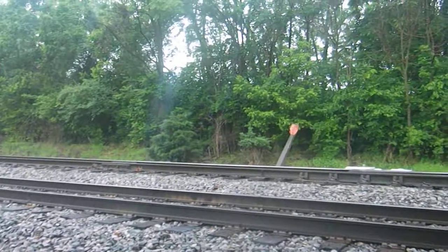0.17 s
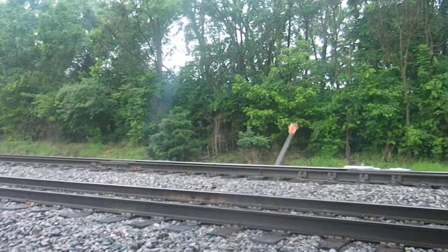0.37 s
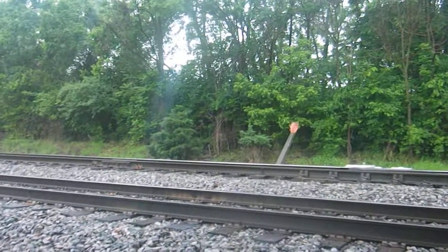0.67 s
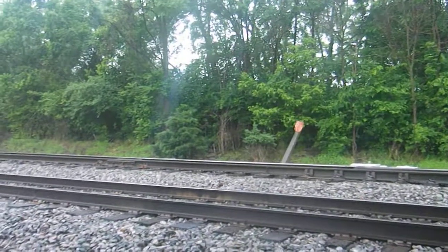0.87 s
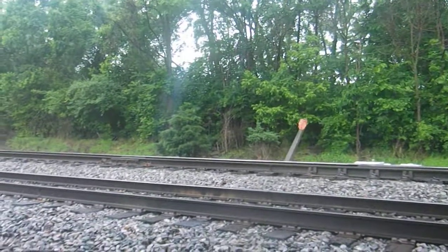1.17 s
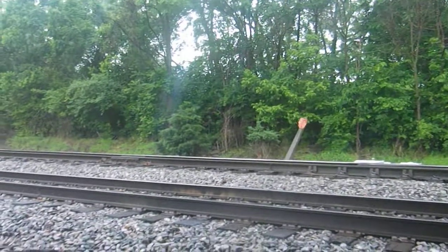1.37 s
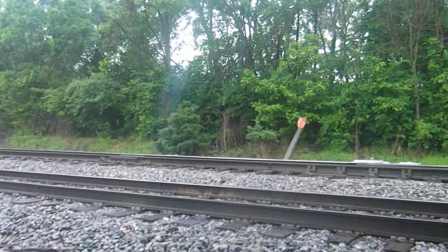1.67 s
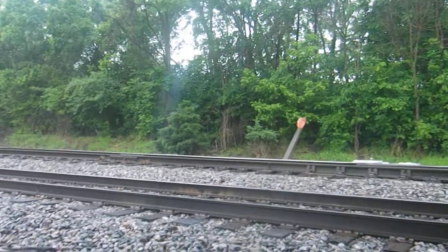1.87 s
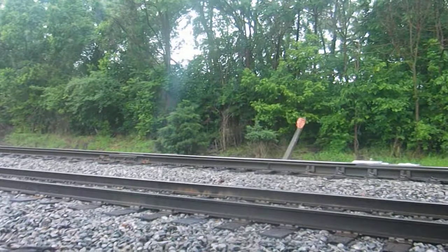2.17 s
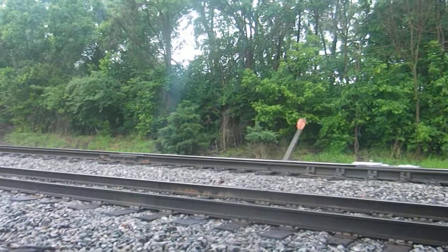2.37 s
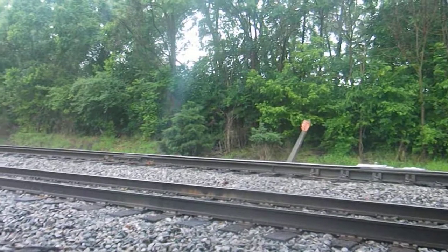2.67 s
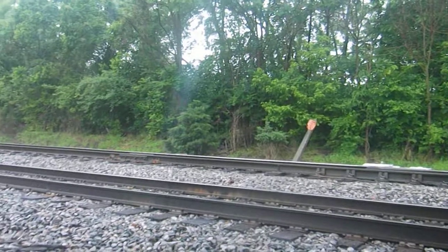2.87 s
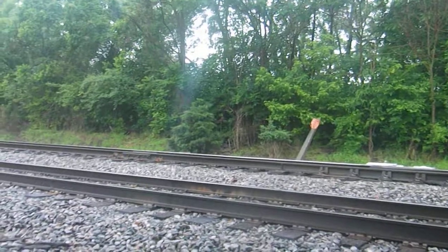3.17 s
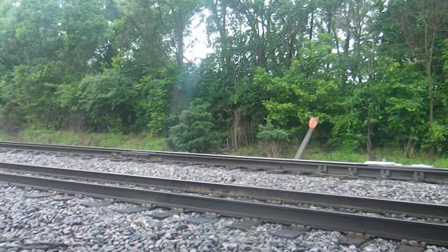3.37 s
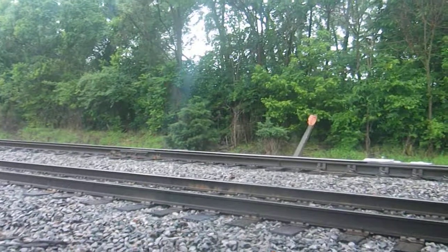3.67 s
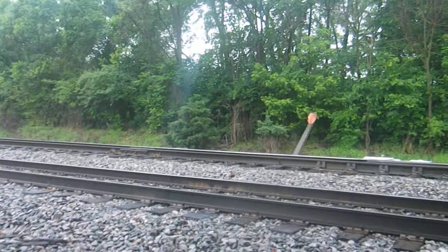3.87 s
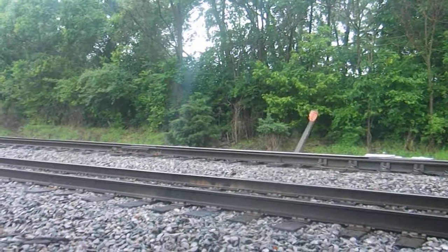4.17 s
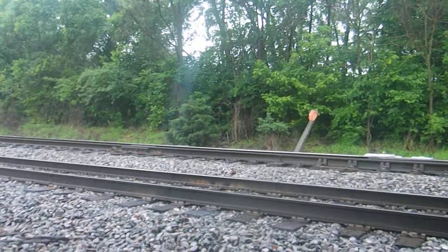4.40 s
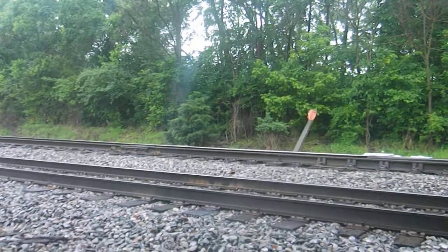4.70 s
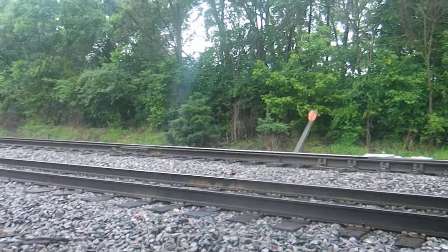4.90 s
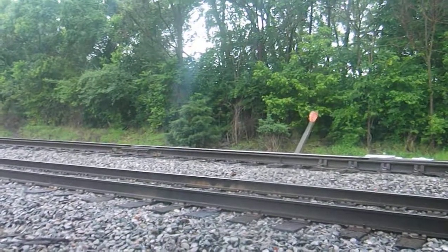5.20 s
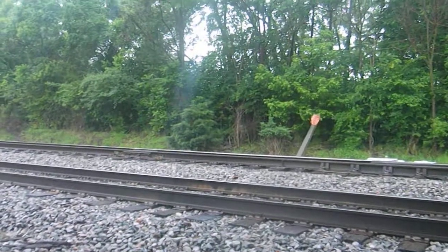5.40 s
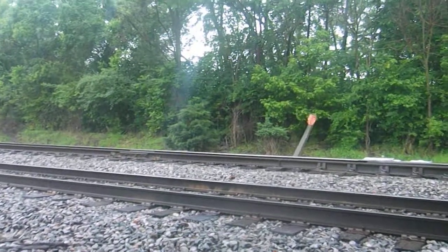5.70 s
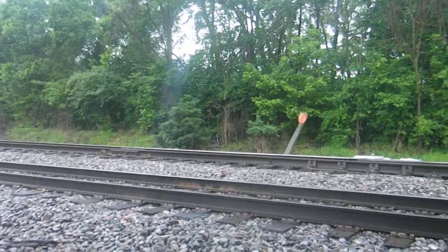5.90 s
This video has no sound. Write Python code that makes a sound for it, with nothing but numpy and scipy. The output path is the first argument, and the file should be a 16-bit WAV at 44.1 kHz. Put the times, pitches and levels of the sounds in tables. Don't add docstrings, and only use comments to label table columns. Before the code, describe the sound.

Clear falling bird whistles echo among trees above a distant traffic drone, joined by a burry wren, while a camera motor whines and fingers finally click its housing.

```python
import sys
import numpy as np
from scipy import signal
from scipy.fft import rfft, irfft, next_fast_len
from scipy.io import wavfile
from scipy.ndimage import uniform_filter1d

SR = 44100
rng = np.random.default_rng(int(sys.argv[2]) if len(sys.argv) > 2 else 0)


def elevation(decibels):
    levels = np.asarray(decibels, float)
    return 10 ** (levels / 20)


def unload_wav(signal):
    wavfile.write(
        sys.argv[1],
        SR,
        np.round(np.clip(np.atleast_2d(signal).T, -1, 1) * 32767).astype(np.int16),
    )


N = 266672
T = np.arange(N) / SR

# pitch_hz, level_db, drift_share (slow pitch drift as a share of the pitch)
ENGINE_TONES = [(40.7, -36, 0.0521), (60.07, -40.5, 0.0504), (78.36, -42, .05), (109.9, -43, .07)]
# time_s, level_db
ENGINE_LOAD = [(0, -2.5), (1.2, -1), (1.7, -0.9), (2.3, 0.5), (3.5, 1.5), (4.2, 0), (4.9, 1), (5.6, 0.3),
               (6.05, -1)]
# pitch_hz, level_db (per Hz)
WASH_COLOUR = [(12, -5.5), (22, 0.5), (45, -2), (100, -7), (200, -14.5), (330, -26.5), (600, -28),
               (1100, -30), (1600, -34), (2800, -37), (4500, -42), (7000, -46), (11000, -48),
               (16000, -48.5)]
# start_s, level_db
MOTOR_CURRENT = [(0, -43), (5.54, -44), (5.599, -47), (5.657, -50.5), (5.708, -69), (5.83, -52),
                 (5.848, -47), (5.868, -45), (5.902, -66), (5.918, -52), (5.94, -44), (5.953, -43.5),
                 (6.0, -48), (6.022, -52), (6.038, -70)]
# multiple (of a quarter of the chopper pitch), level_db
MOTOR_CLOCK = [(1, -69), (2, -68), (3, -68), (5, -70), (6, -73)]
# start_s, length_s, lowest_pitch_hz, level_db
TRILL_BURSTS = [
    (.78, .15, 7250, -59),
    (1.335, 0.11, 7400, -55),
    (1.435, 0.15, 7240, -53.5),
]
# start_s, length_s, level_db
RISING_SLIDES = [
    (0.817, 0.43, -59),
    (1.642, 0.45, -52),
]
# start_s, level_db, plunge_level_db (of the quick drop at the onset)
FALLING_NOTES = [
    (2.206, -47.5, -64),
    (2.565, -46, -68),
    (2.928, -45.5, -66),
    (3.281, -45.5, -46.5),
    (3.634, -46.5, -63),
    (4.004, -44.5, -52),
    (4.361, -46, -70),
]
# start_s, peak_db, brightness_db (per octave)
FINGER_CLICKS = [
    (5.5783, -24, 0),
    (5.6192, -33, 0),
    (5.6745, -37, 0),
    (5.851, -29, 3),
    (1.712, -40, 0),
]
# pitch_hz, width_hz, level_db
HOUSING_RINGS = [(1000, 300, -3), (2000, 250, 0), (2600, 600, -6), (4300, 500, 0), (6200, 700, -2),
                 (7800, 800, -3), (10500, 2000, -7)]
# time_s, level_db
SKIN_RUB = [(5.4, -82), (5.468, -56), (5.53, -58), (5.575, -49), (5.62, -45.5), (5.65, -56), (5.801, -57),
            (5.93, -54), (6.05, -60)]
# start_s, length_s, first_pitch_hz, last_pitch_hz, peak_db
WHISTLER_NOTES = [
    (2.243, .026, 3400, 3200, -45),
    (2.278, .024, 3050, 2800, -53),
    (2.33, .03, 2270, 2220, -55),
    (2.395, .055, 2250, 2320, -52),
    (2.79, .036, 3400, 3200, -44),
    (2.828, .03, 3120, 2860, -52),
    (2.85, .11, 2790, 2740, -55),
    (2.875, .055, 2560, 2300, -54),
    (5.43, .06, 4800, 4760, -61),
]
# start_s, low_level_db, mid_level_db, high_level_db
WREN_PHRASES = [
    (3.742, -59, -58, -64),
    (3.985, -57, -57, -64),
    (4.232, -54, -53, -61),
    (4.48, -52, -52, -60),
    (4.732, -52, -52.5, -62),
    (4.988, -53, -54, -62),
    (5.245, -52, -72, -68),
]
# start_s (within the phrase), length_s, pitch_hz, level_db
WREN_PIPS = [
    (0, .05, 2380, -7),
    (.014, .032, 2860, .5),
    (.056, .02, 2850, -3),
    (.088, .02, 2900, -4),
]
# start_s (within the phrase), length_s, held_pitch_hz, first_swing_hz, last_swing_hz
WREN_BURRS = [
    (.088, .145, 3830, -1000, -300),
    (.165, .19, 4290, 1050, 420),
]


def unit(x):
    return x / np.sqrt(np.mean(x ** 2))


def walk(rate):
    hold = int(SR / rate)
    levels = np.repeat(rng.standard_normal(N // hold + 1), hold)
    return unit(uniform_filter1d(uniform_filter1d(levels, hold), hold)[:N])


def band(x, lo_hz, hi_hz):
    sos = signal.butter(2, [lo_hz, min(hi_hz, .45 * SR)], "bandpass", fs=SR, output="sos")
    return signal.sosfilt(sos, x)


def glide(length, pitch, attack, release, depth_db=24):
    s = np.arange(0, length, .0005)
    edge = np.clip(np.maximum(1 - s / attack, 1 - (length - s) / release), 0, 1)
    return np.transpose([s, pitch(s), -depth_db * edge ** 2])


def add(out, rows, start=0., db=0., bend_hz=0., swell_db=0.):
    s, hz, row_db = np.transpose(rows)
    span = slice(int((start + s[0]) * SR), min(int((start + s[-1]) * SR), N))
    t = T[span] - start
    pitch = np.interp(t, s, hz) + np.broadcast_to(bend_hz, N)[span]
    gain = elevation(np.interp(t, s, row_db) + db + np.broadcast_to(swell_db, N)[span])
    out[span] += np.sqrt(2) * gain * np.sin(2 * np.pi * np.cumsum(pitch) / SR)


def woods(x, t60, wet_db, gap_s, stir, ground_db=-5):
    t = np.arange(int(.8 * SR)) / SR
    fade = np.exp(-np.log(1000) * t / t60) * np.clip(t / gap_s, 0, 1)
    fade = fade / np.sqrt(5 * np.sum(fade ** 2))
    size = next_fast_len(N + len(t))
    echoes = 0
    for _ in range(5):
        echoes = echoes + rfft(x * walk(stir), size) * rfft(fade * rng.standard_normal(len(t)), size)
    bounce = elevation(ground_db) * np.roll(x, int(.00225 * SR))
    return x + bounce + elevation(wet_db) * irfft(echoes, size)[:N]


def load_db():
    return np.interp(T, *np.transpose(ENGINE_LOAD))


def engines():
    out = np.zeros(N)
    for hz, db, drift in ENGINE_TONES:
        bend_hz = hz * drift * walk(3) + .09 * hz * walk(12)
        swell_db = load_db() + 2.5 * walk(11) + 1.5 * walk(5)
        add(out, [(0, hz, db), (N / SR, hz, db)], bend_hz=bend_hz, swell_db=swell_db)
    return out


def wash():
    hz = np.arange(N // 2 + 1) * SR / N + 1
    f, db = np.transpose(WASH_COLOUR)
    colour = elevation(np.interp(np.log(hz), np.log(f), db)) * np.clip(hz / 10, 0, 1) ** 2
    noise = rfft(rng.standard_normal(N)) * colour
    low = 1 / (1 + (hz / 250) ** 4)
    high = 1 / (1 + (2500 / hz) ** 2)
    rumble = irfft(noise * low, N) * elevation(0.46 * load_db())
    traffic = irfft(noise * (1 - low) * (1 - high), N) * elevation(0.26 * load_db() + .5 * walk(4.84))
    hiss = irfft(noise * (1 - low) * high, N)
    return unit(rumble + traffic + hiss) * elevation(-32)


def lens_motor():
    chop_hz, turn_cycles, first_turn_s, turn_s = 9293.8, 132, .003, .00006
    readout_hz, readout_db, readout_start_s, frame_rate = 11373.25, -68, .31, 29.9
    s, db = np.transpose(MOTOR_CURRENT)
    current = uniform_filter1d(elevation(db)[np.searchsorted(s[1:], T, "right")], size=40)
    cycles = (T - first_turn_s) * chop_hz
    ramp = np.arcsin(np.sin(np.pi * cycles / turn_cycles)) / np.pi * turn_cycles / chop_hz
    polarity = np.clip(ramp / turn_s, -1, 1) - 0.11
    whine = current * polarity * (1 + 0.03 * walk(300)) * np.sin(2 * np.pi * cycles + 0.31)
    clock = sum(elevation(g) * np.sin(np.pi / 2 * k * cycles) for k, g in MOTOR_CLOCK)
    frame = np.sign(np.sin(np.pi * frame_rate * np.maximum(T - readout_start_s, 1 / SR)))
    readout = elevation(readout_db) * frame * np.sin(2 * np.pi * readout_hz * T)
    return np.sqrt(2) * (whine + current / elevation(db[0]) * clock + readout)


def triller():
    beats_per_s, flick_hz = 34.5, 850
    out = np.zeros(N)
    beat = ((T - 1.484) * beats_per_s) % 1
    gaps_db = -14 * np.exp(-beat / 0.12) - 6 * np.exp(-((beat - .68) / 0.061) ** 2)
    for start, length, hz, db in TRILL_BURSTS:
        rows = glide(length, lambda s: hz - 700 * s, attack=.025, release=.06, depth_db=15)
        add(out, rows, start, db, bend_hz=flick_hz * beat ** 4, swell_db=gaps_db)
    return woods(out, t60=.3, wet_db=-6, gap_s=.011, stir=80, ground_db=-7)


def rising_pitch(s):
    return 1985 - 260 * np.exp(-s / .012) + 2500 * s + 15500 * s ** 3


def falling_pitch(s, handover_s, handover_width_s):
    plunge_hz = 1800 * np.exp(-s / .0105)
    sag_hz = 4300 * (s - .25 * np.maximum(s - handover_s, 0))
    step_hz = 95 * np.clip((s - handover_s) / handover_width_s, 0, 1)
    return 2300 + plunge_hz - sag_hz - step_hz


def songbird():
    handover_s, handover_width_s = .071, .015
    out, shimmer = np.zeros(N), 1.4 * walk(60)
    for start, length, db in RISING_SLIDES:
        rows = glide(length, rising_pitch, attack=.022, release=.1)
        add(out, rows, start, db, swell_db=shimmer - 8 * (T - start))
    for start, db, plunge_db in FALLING_NOTES:
        rows = glide(.15, lambda s: falling_pitch(s, handover_s, handover_width_s), .048, .045)
        s = rows[:, 0]
        level_db = np.maximum(db + rows[:, 2], plunge_db - 600 * s)
        dip_db = -12 * np.exp(-((s - handover_s) / handover_width_s) ** 2)
        rows[:, 2] = level_db + dip_db - 3 * (s > handover_s)
        add(out, rows, start, swell_db=shimmer)
    return woods(out, t60=.6, wet_db=-1, gap_s=.015, stir=190)


def fingers():
    out, t = np.zeros(N), np.arange(600) / SR
    for start, peak_db, bright_db in FINGER_CLICKS:
        ring = np.zeros(len(t))
        for k, (hz, width_hz, db) in enumerate(HOUSING_RINGS):
            gain = elevation(db + bright_db * np.log2(hz / 4000))
            ring += gain * np.exp(-np.pi * width_hz * t) * np.sin(2 * np.pi * hz * t + k)
        first = int(start * SR)
        out[first:first + 600] += elevation(peak_db) * ring / np.abs(ring).max()
    s, db = np.transpose(SKIN_RUB)
    rub_db = np.interp(T, s, db, left=-120) + 3.4 * walk(70)
    return out + unit(band(rng.standard_normal(N), 230, 1200)) * elevation(rub_db)


def whistler():
    out, waver = np.zeros(N), 40 * walk(120)
    for start, length, first_hz, last_hz, db in WHISTLER_NOTES:
        slide = lambda s: first_hz + (last_hz - first_hz) * s / length
        rows = glide(length, slide, 0.37 * length, 0.2 * length)
        add(out, rows, start, db, bend_hz=waver)
    return woods(out, t60=.5, wet_db=-6, gap_s=.03, stir=300, ground_db=-12)


def wren():
    strokes_per_s, narrow_s = 62, .065
    out = np.zeros(N)
    jitter, shimmer = 40 * walk(200), 2.0 * walk(120)
    for start, low_db, *burr_levels in WREN_PHRASES:
        for s0, length, hz, db in WREN_PIPS:
            rows = glide(length, lambda s: hz - 280 * np.exp(-s / .01), 0.0035, 0.0033)
            add(out, rows, start + s0, low_db + db, bend_hz=0.42 * jitter, swell_db=.5 * shimmer)
        for (s0, length, held_hz, first_hz, last_hz), db in zip(WREN_BURRS, burr_levels):
            stagger = .4 * np.cumsum(rng.standard_normal(int(np.ceil(length / .0005)))) / 8

            def burr_pitch(s):
                swing_hz = last_hz + (first_hz - last_hz) * np.exp(-(s / narrow_s) ** 2)
                stroke = (.5 + .5 * np.cos(2 * np.pi * s * strokes_per_s + stagger)) ** 1.2
                return held_hz + swing_hz * stroke

            rows = glide(length, burr_pitch, attack=.006, release=.015)
            rows[:, 2] += 5 * np.exp(-(rows[:, 0] / narrow_s) ** 2)
            add(out, rows, start + s0, db - 5.5, bend_hz=jitter, swell_db=shimmer)
    return woods(out, t60=.38, wet_db=-4, gap_s=.008, stir=180, ground_db=-20)


def scene():
    camera = lens_motor() + fingers()
    birds = triller() + songbird() + whistler() + wren()
    return (engines() + wash() + birds + camera)[None]


def band_limit(x):
    return signal.sosfilt(signal.butter(12, 16060, fs=SR, output="sos"), x)


def record(dry):
    low_pass = signal.ellip(10, .2, 70, 15740, fs=SR, output="sos")
    mix = signal.sosfilt(low_pass, dry)
    return band_limit(mix)


dry = scene()
out = record(dry)
unload_wav(out)
```